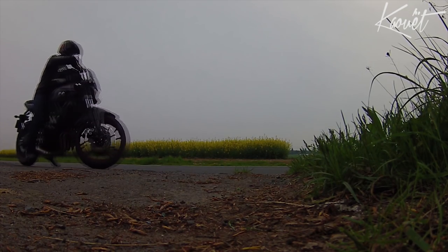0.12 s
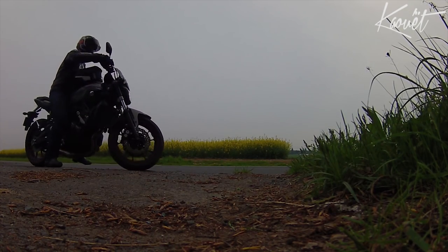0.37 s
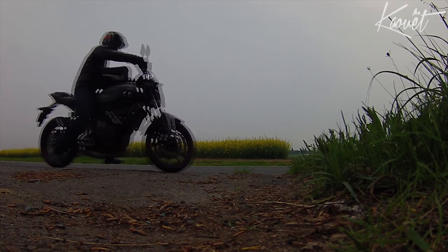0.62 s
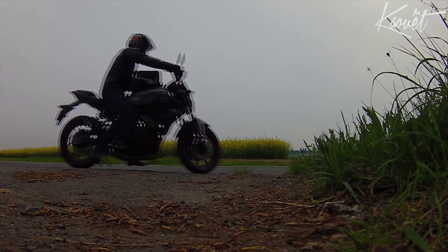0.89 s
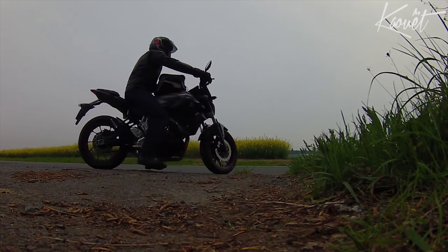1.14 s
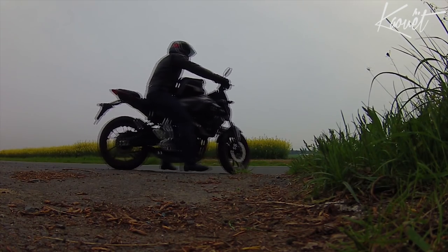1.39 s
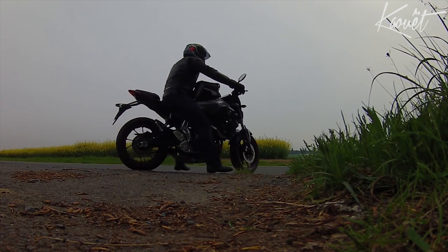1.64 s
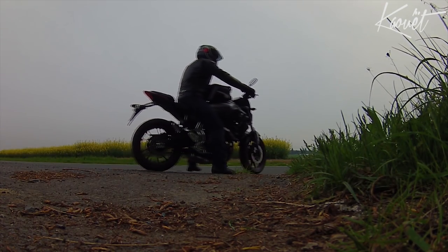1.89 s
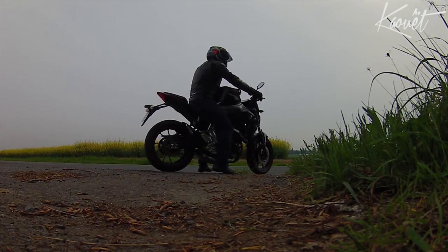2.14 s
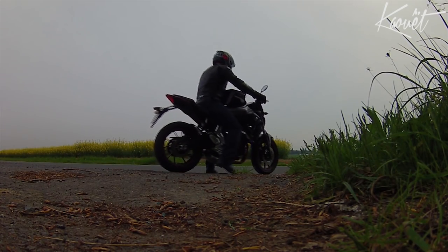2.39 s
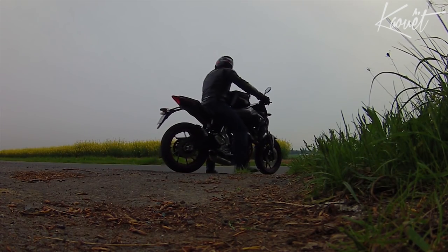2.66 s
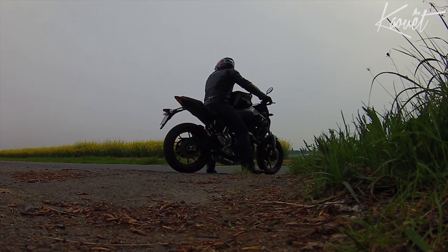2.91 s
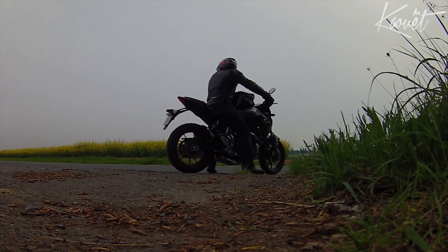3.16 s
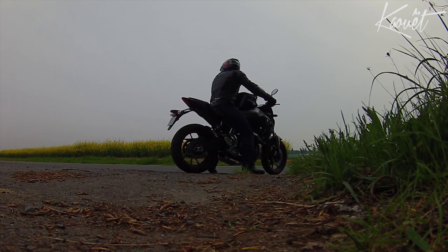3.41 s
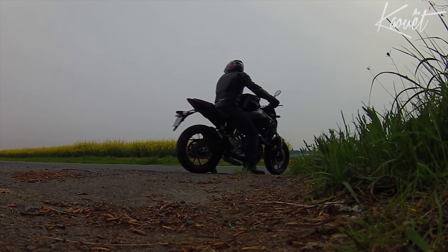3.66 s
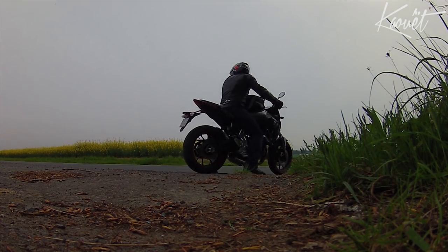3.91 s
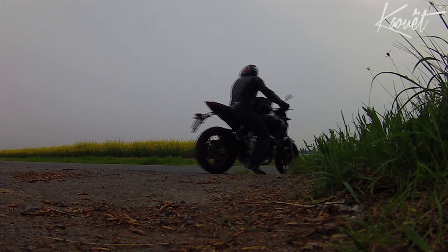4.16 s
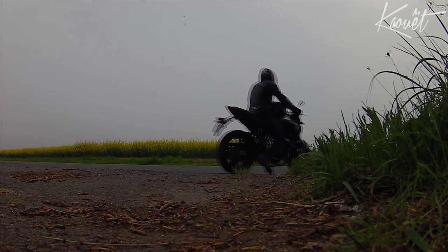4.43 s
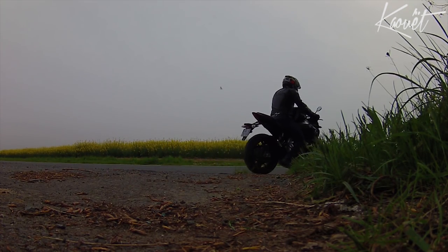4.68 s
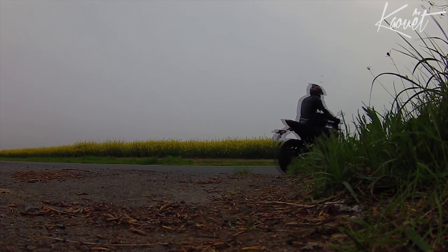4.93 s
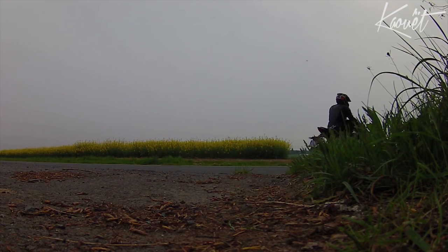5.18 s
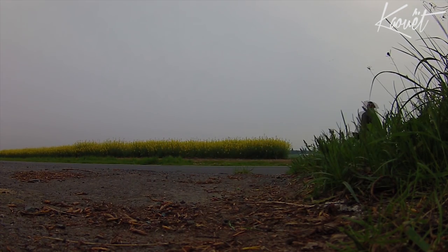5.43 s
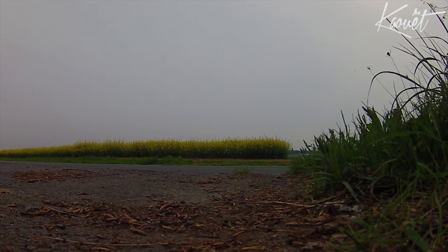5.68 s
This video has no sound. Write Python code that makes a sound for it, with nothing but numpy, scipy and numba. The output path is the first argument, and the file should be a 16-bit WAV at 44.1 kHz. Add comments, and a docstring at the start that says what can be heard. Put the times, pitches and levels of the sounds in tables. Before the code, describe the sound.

Open countryside, a small mono roadside microphone, faint low wind and hiss, no room echo. From 0 to 0.5 s a twin-cylinder motorcycle with an open exhaust rolls in at a moderate, uneven, throaty burble. The note drops and flutters between 0.5 and 1 s, with a dull triple gear-lever clunk near 0.8 s. From 1 to 3.4 s it idles slowly and quietly, a lumpy low throb with valve clatter, ringing covers and light metallic ticks around 2.3, 2.5 and 3.2 s. At 3.43 s the intake gasps and two abrupt, cracking throttle blips bark at about 3.45 and 3.64 s, revs jumping. From 4 s the bike pulls away in a fast, deep, rasping growl, revs dipping and rising. After 5 s the tailpipe faces the microphone: loud boom, pulsing bright gas hiss, wavering gear whine and swelling tyre rasp, still loudest at the 5.8 s cut-off.

```python
"""A twin-cylinder motorcycle with an open exhaust coasts to a stop on a country road; the exhaust note
drops briefly and the gear lever clunks. It idles, light ticks amid the valve clatter and wind, then gasps air
and gets two throttle blips. It pulls away, tailpipe turning to the microphone, with gear whine and rasping
tyres. Two uneven firings a cycle excite the resonances of pipe and cases; filtered noise makes the gas hiss."""
import sys
import numpy as np
from scipy import signal
from scipy.fft import rfft, irfft
from scipy.io import wavfile
from scipy.ndimage import uniform_filter1d, map_coordinates
from numba import njit

SR = 44100
rng = np.random.default_rng(int(sys.argv[2]) if len(sys.argv) > 2 else 0)


def wav_record(signal):
    """Record a signal, one row per channel, as 16-bit PCM in the file named by sys.argv[1]."""
    frames = np.transpose(np.atleast_2d(signal))
    bounded = np.clip(frames, -1, 1)
    # unit amplitude maps onto the largest positive 16-bit level
    quanta = np.round(bounded * 32767).astype(np.int16)
    wavfile.write(sys.argv[1], SR, quanta)


def ratio(d):
    """dB to gain"""
    e = np.asarray(d, float) / 20
    return 10 ** e


N = 256220

# Four-stroke cycle rate: t/s, f/Hz
CYCLE_RATE = [(0.0, 18.63), (0.284, 17.83), (0.485, 19.04), (1.028, 11.53), (1.614, 10.6), (1.949, 11.19),
              (2.442, 10.73), (2.731, 11.1), (3.425, 10.02), (3.519, 24.03), (3.622, 23.69), (3.723, 33.63),
              (3.941, 25.0), (4.066, 28.22), (4.522, 19.15), (4.834, 22.51), (5.179, 19.11), (5.81, 19.05)]
# Where the cycle starts, and how far the second firing lags (270 of 720 degrees), both in cycles
FIRST_TURN, CYLINDER_LAG = -.772, .375
# Firing strength apart from blips: t/s, boom level/dB
FIRING = [(0, -39.5), (.48, -39.5), (.53, -47), (.62, -46), (.66, -42), (.71, -57.5), (.78, -47),
          (.86, -54.5), (.95, -52), (1.02, -48.5), (1.7, -45.5), (3.4, -43.5), (3.46, -37), (3.55, -37.5),
          (3.62, -33.5), (3.75, -31), (3.93, -35), (3.99, -27.5), (4.35, -27.5), (4.57, -28), (4.84, -26),
          (5.3, -23), (5.81, -20.5)]
# Motion and operating state: t/s, engine load (0-1), tailpipe facing the microphone (0-1),
# long-mode bandwidth/Hz, throat level over boom/dB, bark gain/dB
RIDE = [(0, 0.2, 0.56, 14, -6.5, 3.5), (.48, 0.23, 0.46, 18.3, -5, 8), (.54, 0.19, 0.5, 18, -12.5, 5.5),
        (.88, 0.09, 0.57, 11, -11, 4), (1, 0.03, 0.49, 19.3, -18.5, 1), (2.3, 0, 0.64, 20, -16, -3),
        (3.41, 0.04, 0.66, 15.3, -17, -3), (3.46, 0.74, 0.77, 79, 0, -3.5), (3.52, 0.42, 0.77, 24, -1, 4.5),
        (3.55, 0.4, 0.83, 14, -2, -1), (3.62, 0.73, 0.76, 27, -14, 3), (3.65, 0.57, 0.74, 33, 4.5, 6.5),
        (3.715, 0.58, 0.78, 78, -24, 6), (3.745, 0.5, 0.94, 44, -11, -2.5),
        (3.92, 0.34, 0.88, 32, -10, 1.5), (3.99, 0.58, 0.87, 40, -19, 5.5), (4.1, 0.56, 0.92, 40, -17, 5.5),
        (4.35, 0.67, 0.88, 64, -4, 1.5), (4.7, 0.64, 0.92, 54, -3, 3.5), (5.2, 0.64, 0.91, 47, -3.5, 0),
        (5.81, 0.69, 0.98, 54, -1.5, -4)]
# Throttle snapped open and shut: start t/s, length/s, boom gain/dB
BLIPS = [(3.454, 0.053, 9), (3.636, 0.062, 9.5)]
BLIP_RISE_S, BLIP_FALL_S = 0.016, 0.05
BLIP_BARK_DB, BLIP_RUSH_DB, BLIP_CLATTER_DB = 4.5, 9, 3  # added while a blip is open
# Noise level of the moving parts, jumping up just before the first blip: t/s, level/dB
MACHINE = [(0, -67.5), (.5, -66.5), (.72, -72.5), (1.2, -69), (2.1, -64.5), (3.41, -64), (3.445, -50.5),
           (4.1, -51.5), (4.5, -51.5), (5.3, -44.5), (5.81, -44.5)]
# (tailpipe turned away, facing): bark over boom; clatter and gas hiss over the moving parts
BARK_DB, CLATTER_DB, RUSH_DB = (-29.5, -9.5), (14.5, 14.5), (-27.5, 8)
LOAD_CLATTER_DB = (0, -16)  # (idle, full load): the cases rattle less

# Long pipe modes and intake thump: (idle, full load)
LOW_MODE_HZ, HIGH_MODE_HZ, HIGH_MODE_DB = (125.5, 181.4), (188.5, 176), (-33, 12)
INTAKE_DB = (-0.5, -109)
BOOM_BAND_HZ = (210, 150)  # bandwidth: the boom narrows with load
BOOM_LAG_MS = (.7, 1.9)  # the long modes build up just after the pressure dip
# Pitch of the long modes wanders up and down: t/s, detune/%
PIPE_DRIFT = [(3.4, 2), (3.75, -6), (4.1, -0.5), (4.3, -1.5), (4.6, -0.5), (5.81, -2.5)]
ECHO_MS, ECHO_DB = 7.39, -9.5  # round trip of the pulse along the pipe
HEADER_MS, HEADER_DB = 10.29, -4  # later echo from the header pipes, scaled by load
# Short pipe modes: f/Hz, bandwidth/Hz, level/dB
THROAT = [(198.6, 180, 3), (327, 44, -4.5)]
THROAT_CHOKE_DB = -22.5  # times load: weakens the upper throat mode
THROAT_LEAD_MS = 1.068  # the pressure wave swells in the throat before it bursts out
# Upper pipe modes: f/Hz, bandwidth/Hz, level/dB
BARK = [(380.6, 70, 17), (554, 182, 24), (809, 200, 26)]
BARK_BAND_HZ, BARK_WIDTH_HZ = (480, 690), (1700, 750)  # with load the bark climbs and tightens
LOADED_FROM, LOADED_CUT_HZ = 0.549, 65  # above this load the pipe loses its deepest bass
# Brief moments when the exhaust note drops: t/s, length/s, level/dB
EXHAUST_DROPS = [(0.694, .008, -3), (.742, .012, -4), (0.87, 0.011, -5), (.943, 0.015, -20)]

# Resonances of covers and airbox: f/Hz, bandwidth/Hz, level/dB
CASES = [(323, 140, 5.5), (700, 300, 6), (987, 246, -1)]
# Bright resonances of the shaken cases: f/Hz, bandwidth/Hz, level/dB
CASE_RASP = [(1446, 1460, 13), (1934, 36, 11.5), (2550, 34, -3), (3950, 250, 5)]
# Panels that ring while facing the microphone: start t/s, end t/s, f/Hz, bandwidth/Hz, level over boom/dB
PANELS = [(-0.5, 0.502, 631, 20, -16.5), (-0.5, .45, 2864, 98, -39.5), (1.398, 3.31, 862, 38, -11.5),
          (1.414, 1.96, 1760, 15, -31), (2.001, 2.7, 1840, 15, -27.5), (2.2, 3.0, 2500, 60, -33),
          (1.4, 3.16, 3320, 80, -46), (3.996, 6.1, 588, 8.8, -26.5)]
TURN_S = 0.3  # fade before each start and after each end

# Spectrum of the gas rush: f/Hz, spectral level/dB
GAS = [(1410, -8), (2400, -2), (2830, -5), (4080, -1), (4480, -5.5), (4880, -1.5), (6800, -6), (9300, -6.5),
       (11000, -10.5), (14200, -21), (15500, -24)]
# Places in the cycle where the valves hiss: turn/cycles
VALVE_TURNS = [-.38, -.1, .235]
PUFF = (0.56, 0.58)  # (idle, full load): share of the hiss that comes in puffs
PULL_S, PUFF_PER_S = 5.04, 0.16  # start of pulling off, and growth of that share from then on
OUTLET_S = 4.1  # from here the puffs at the outlet take over from the valves
OUTLET_RASP_DB = 7

WIND_DB = -61.5
# Gear lever knocks: t/s, level before filtering/dB
CLUNK = [(0.783, -50), (0.797, -42), (0.809, -49)]
# Ticks at idle: t/s, level before filtering/dB
TICKS = [(2.343, -60), (2.5331, -58), (3.1805, -54.5)]
# Intake gasps as the throttle opens: start t/s, length/s, f/Hz, level/dB
GASPS = [(3.428, 0.016, 846, -49.5), (3.635, 0.0097, 1870, -43.5)]
# Bright pipe modes of a wide-open throttle: f/Hz, bandwidth/Hz, level/dB
CRACK = [(700, 100, 56.5), (1170, 170, 44), (1690, 260, 30.5), (2250, 570, 26.5)]
CRACK_DB = -6
# Gear teeth meshing, one track per tone: t/s, f/Hz, level before wavering/dB
WHINE = [
    [(4.86, 983, -49), (4.97, 1080, -44)],
    [(4.96, 1001, -42), (5.14, 1172, -46)],
    [(4.97, 577, -58), (5.19, 700, -35)],
    [(5.17, 729, -38.5), (5.31, 718, -34)],
    [(5.4, 1018, -44), (5.54, 1084, -41)],
    [(5.49, 435, -41), (5.76, 497, -49)],
    [(5.47, 856, -56), (5.63, 946, -37.5), (5.85, 1055, -41)],
    [(5.49, 643, -33), (5.62, 695, -54), (5.85, 745, -53)],
]
TYRE_HZ, TYRE_WIDTH_HZ, TYRE_DB, TYRE_DB_PER_S = 1600, 380, -60.5, 21.5
HISS_DB = -82


def level(x, db):
    """Root-mean-square normalisation to a level in dB."""
    return x * ratio(db) / np.sqrt(np.mean(x ** 2))


def curves(table):
    """Linear interpolation in time of each column after the first."""
    s, *columns = np.transpose(table)
    return [np.interp(np.arange(N) / SR, s, c) for c in columns]


def between(pair, share):
    """Linear mixing from the first of a pair to the second."""
    return pair[0] + (pair[1] - pair[0]) * np.clip(share, 0, 1)


def gate(start, end, rise, fall):
    """Trapezoidal envelope: 0 to 1 over rise s from start, back over fall s from end."""
    hold = max(end, start + rise)
    return np.interp(np.arange(N) / SR, [start, start + rise, hold, hold + fall], [0, 1, 1, 0])


@njit
def svf(x, hz, width):
    """Resonance: a state-variable band-pass with a moving centre and unit gain there."""
    y, b, l = np.empty(len(x)), 0., 0.
    for i in range(len(x)):
        g, k = np.tan(np.pi * hz[i] / SR), width[i] / hz[i]
        v = (b + g * (x[i] - l)) / (1 + g * (g + k))
        b, l, y[i] = 2 * v - b, l + 2 * g * v, k * v
    return y


def steep(x, hz, width, order=2):
    """Cascaded resonance, by default applied twice: slow rise, dark skirts."""
    for _ in range(order):
        x = svf(x + 1e-18, hz + np.zeros(N), width + np.zeros(N))
    return x


def modes(x, table, order=2):
    """Modal superposition: parallel resonances summed at their levels."""
    return sum(ratio(db) * steep(x, hz, width, order) for hz, width, db in table)


def fade(x, ms):
    """Exponential decay: each click becomes a tail of the same height."""
    return signal.lfilter([1], [1, -np.exp(-1000 / (ms * SR))], x)


def walk(rate):
    """Smoothed random fluctuation: a slow wander with spread near 1."""
    k = int(SR / rate)
    steps = np.repeat(rng.standard_normal(N // k + 1), k)
    return 1.3 * uniform_filter1d(uniform_filter1d(steps, k), k)[:N]


def knocks(table):
    """Impulsive excitation: one click per row of times and levels."""
    clicks = np.zeros(N)
    for s, db in table:
        clicks[int(s * SR)] = ratio(db)
    return clicks


def firings(turns, offsets, offsets_db, scatter_db, jitter_ms):
    """Cyclic excitation: clicks at given places of every cycle, each of its own size."""
    place = np.arange(-1, int(turns[-1]) + 1)[:, None] + np.array(offsets)
    chance = rng.standard_normal(size=place.shape + (2,))
    at = np.interp(place, turns, np.arange(N), right=N) + jitter_ms * SR / 1000 * chance[..., 0]
    size = ratio(np.array(offsets_db) + scatter_db * chance[..., 1])
    keep = (place > turns[0] - 1 / 3) & (at < N - 1)  # the firing just past still rings
    clicks = np.zeros(N)
    np.add.at(clicks, np.maximum(at[keep], 0).astype(int), size[keep])
    return clicks


def long_pipe(pressure, load, width):
    """Beating of two long pipe modes, confined to one broad boom band."""
    low, high, high_db = (between(pair, load) for pair in (LOW_MODE_HZ, HIGH_MODE_HZ, HIGH_MODE_DB))
    tune = 1 + curves(PIPE_DRIFT)[0] / 100
    lower = steep(pressure, low * tune, width, order=1)
    upper = steep(pressure, high * tune, width, order=1)
    return steep(lower - ratio(high_db) * upper, 167.7, between(BOOM_BAND_HZ, load), order=1)


def throat(pressure, load):
    """Short-pipe resonance, whose upper mode weakens under load."""
    hz, width, db = THROAT[1]
    return modes(pressure, [THROAT[0], (hz, width, db + THROAT_CHOKE_DB * load)])


def bark(pressure, load):
    """Upper pipe resonance inside a band that climbs and tightens with load."""
    hz, width = between(BARK_BAND_HZ, load / 0.65), between(BARK_WIDTH_HZ, load / 0.5)
    return steep(modes(pressure, BARK, order=1), hz, width)


def exhaust(turns, fire, rate, load, width, boom_db, throat_db, bark_db):
    """Forced pipe resonance: rounded firing pulses and their echoes ring long and short modes."""
    gulps = firings(turns, [.26 - CYLINDER_LAG, .3], [0, -1], scatter_db=1.2, jitter_ms=.15)
    gulps = gulps * ratio(between(INTAKE_DB, load))
    pulse = signal.windows.hann(int(1.8 * SR / 1000))
    # dividing by the root of the rate keeps the power the same at any speed
    even, thump = (np.convolve(p / np.sqrt(rate), pulse, "same") for p in (fire, fire + gulps))
    echoed = even + sum(ratio(k * ECHO_DB) * np.roll(even, int(k * ECHO_MS * SR / 1000)) for k in (1, 2))
    echoed = echoed + ratio(HEADER_DB) * load * np.roll(even, int(HEADER_MS * SR / 1000))
    lag = between(BOOM_LAG_MS, load / 0.61) * SR / 1000
    thump = -map_coordinates(thump, [np.arange(N) - lag], order=1)
    early = np.roll(even, -int(THROAT_LEAD_MS * SR / 1000))
    layers = [(lambda p: long_pipe(p, load, width), thump, boom_db),
              (lambda p: throat(p, load), early, throat_db),
              (lambda p: bark(p, load), echoed, bark_db)]
    full = sum(ring(push * ratio(db)) / np.std(ring(push)) for ring, push, db in layers)
    thin = signal.sosfilt(signal.butter(4, LOADED_CUT_HZ, "high", fs=SR, output="sos"), full)
    drops = ratio(sum(db * gate(s - .01, s + length, .01, 0.0078) for s, length, db in EXHAUST_DROPS))
    return drops * between((full, thin), (load - LOADED_FROM) / 0.12)


def clatter(turns, fire, boom_db, cases_db, rasp_db):
    """Structural resonance: valve seatings and firings shake the cases unevenly; each seating ticks."""
    valves = firings(turns, [-.15, .1, .3, .5], [-3, -3, 0, -2], scatter_db=2, jitter_ms=.2)

    def shake(tick):
        """Amplitude-modulated noise with a click at each seating."""
        swell = 2.2 + fade(valves, ms=59.0) + 6.9 * fade(fire, ms=12.6)
        return swell * rng.standard_normal(N) + tick * valves

    # two clicks in every cycle, over steady noise, ring the panels
    clicks = firings(turns, [-.27, .39], [-4, 0], scatter_db=1.5, jitter_ms=.3)
    drum = rng.standard_normal(N) + 140 * clicks
    panels = sum(gate(start - TURN_S, end, TURN_S, TURN_S) * level(steep(drum, hz, width), db)
                 for start, end, hz, width, db in PANELS)
    cases = ratio(cases_db) * level(modes(shake(tick=4.9), CASES), 0)
    rasp = ratio(rasp_db) * level(modes(shake(tick=26.0), CASE_RASP), 0)
    return ratio(boom_db) * panels + cases + rasp


def gas(turns, fire, puff, pulled):
    """Turbulence noise: a steady rush, and brighter puffs as valves move and, later, at each firing."""
    hz, db = np.transpose(GAS)
    bins = np.maximum(np.fft.rfftfreq(N, 1 / SR), 1)
    shape = ratio(np.interp(np.log(bins), np.log(hz), db))
    rush = level(irfft(rfft(rng.standard_normal(N)) * shape, N), 0)
    bright = signal.sosfilt(signal.butter(2, 4200, "high", fs=SR, output="sos"), rush)
    whistle = 1.48 * steep(bright, 4200, 7500, order=1)
    bright = between((bright, whistle), pulled / .5)  # the open tailpipe whistles
    rasp = np.clip(pulled / .5, 0, 1) * steep(rush, 1700, 940)
    bright = bright + ratio(OUTLET_RASP_DB) * rasp
    puff = np.clip(puff, 0, 1)
    valves = firings(turns, VALVE_TURNS, [-1, 0, -1], scatter_db=1.5, jitter_ms=.3)
    leaving = between((valves, fire), (np.arange(N) / SR - OUTLET_S) / 0.65)
    swell = np.convolve(fade(leaving, ms=3.5), signal.windows.hann(int(4 * SR / 1000)), "same")
    steady = (1 - puff) * ratio(walk(25)) * rush
    return steady + 3 * puff * ratio(1.07 * walk(30)) * swell / swell.max() * bright


def wind():
    """Low-frequency turbulence: a faint wavering rumble of air over the field."""
    return level(steep(rng.standard_normal(N), 37, 160) * ratio(2 * walk(6.9)), WIND_DB)


def lever_clunk():
    """Impact excitation: knocks of the gear lever, as decaying noise, ring three damped modes."""
    rattle = fade(fade(knocks(CLUNK), ms=0.73) / (0.002 * SR), ms=24) * rng.standard_normal(N)
    return 4 * modes(rattle, [(480, 450, 4), (1020, 500, 0), (2300, 1600, -12)])


def ticks():
    """Impact excitation: lone light metallic ticks of decaying, band-limited noise at idle."""
    return steep(fade(knocks(TICKS), ms=12.0) * rng.standard_normal(N), 3350, 3200, order=1)


def gasps():
    """Flow noise: a short band of hiss as the intake gulps air for each blip."""
    air = rng.standard_normal(N)
    return sum(gate(s, s + length, 0.003, 0.005) * level(steep(air, hz, 1.3 * hz, order=1), db)
               for s, length, hz, db in GASPS)


def cracks(fire):
    """Pulse reflection: steep full-throttle firing fronts and their pipe echoes ring bright modes."""
    echoed = sum(ratio(k * -5.0) * np.roll(fire, int(k * ECHO_MS / 2 * SR / 1000)) for k in range(5))
    return ratio(CRACK_DB) * modes(echoed, CRACK)


def gear_whine():
    """Periodic tooth meshing: wavering sine tones of the gearbox under load."""
    out = np.zeros(N)
    t = np.arange(N) / SR
    for track in WHINE:
        hz, db = curves(track)
        edge = np.clip(np.minimum(t - track[0][0], track[-1][0] - t) / 0.035, 0, 1)
        out += edge * ratio(db + 0.79 * walk(14.0)) * np.sin(2 * np.pi * np.cumsum(hz) / SR)
    return out


def tyres(pulled):
    """Rolling noise: a rough tyre band that swells as the bike pulls off."""
    rough = steep(rng.standard_normal(N), TYRE_HZ, TYRE_WIDTH_HZ) * ratio(3.1 * walk(20))
    return level(rough, TYRE_DB) * ratio(TYRE_DB_PER_S * pulled) * np.clip(pulled / 0.27, 0, 1)


def scene():
    """Superposition: speed, load and the bike's heading drive the engine layers; the rest are added."""
    rate, = curves(CYCLE_RATE)
    rate = uniform_filter1d(rate, size=SR // 25)  # the flywheel rounds off changes of speed
    turns = FIRST_TURN + np.cumsum(rate) / SR
    boom_db, = curves(FIRING)
    parts_db, = curves(MACHINE)
    load, facing, width, throat_gain, bark_gain = curves(RIDE)
    snaps = [gate(s, s + length, BLIP_RISE_S, BLIP_FALL_S) for s, length, _ in BLIPS]
    blip, pulled = sum(snaps), np.maximum(np.arange(N) / SR - PULL_S, 0)
    boom_db = boom_db + sum(snap * db for snap, (_, _, db) in zip(snaps, BLIPS))
    bark_db = boom_db + between(BARK_DB, facing) + BLIP_BARK_DB * blip + bark_gain
    throat_db = boom_db + throat_gain
    cases_db = parts_db + between(CLATTER_DB, facing) + between(LOAD_CLATTER_DB, load)
    cases_db = cases_db + BLIP_CLATTER_DB * blip
    rush_db = parts_db + between(RUSH_DB, facing) + BLIP_RUSH_DB * blip
    puff = between(PUFF, load) + PUFF_PER_S * pulled
    fire = firings(turns, [-CYLINDER_LAG, 0], [-2.5, 0], scatter_db=.6, jitter_ms=.03)
    bike = exhaust(turns, fire, rate, load, width, boom_db, throat_db, bark_db)
    bike += clatter(turns, fire, boom_db, cases_db, parts_db)
    bike += ratio(rush_db) * gas(turns, fire, puff, pulled)
    bike += wind() + lever_clunk() + ticks() + gasps()
    bike += cracks(fire * blip * ratio(boom_db)) + gear_whine() + tyres(pulled)
    return bike[None]


def band_limit(x):
    """A steep low-pass at the top of the band."""
    return signal.sosfilt(signal.butter(12, 15740, fs=SR, output="sos"), x)


def record(dry):
    """High-pass response and self-noise: a small microphone drops deep bass and adds faint hiss."""
    thin = signal.sosfilt(signal.butter(2, 62, "high", fs=SR, output="sos"), dry)
    mix = thin + level(rng.standard_normal(dry.shape), HISS_DB)
    return band_limit(mix)


dry = scene()
out = record(dry)
wav_record(out)
```